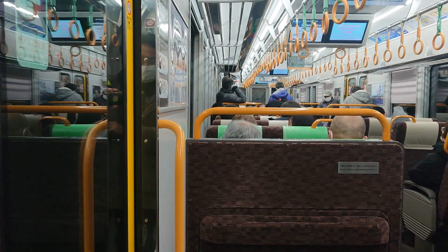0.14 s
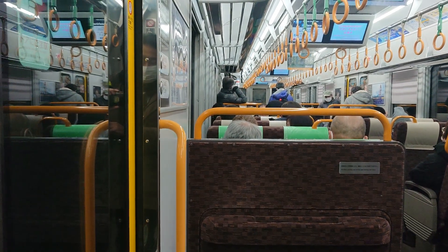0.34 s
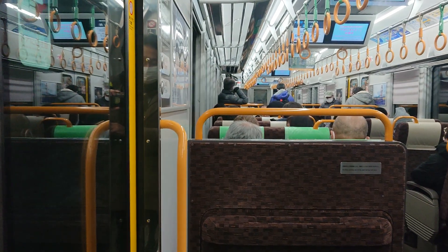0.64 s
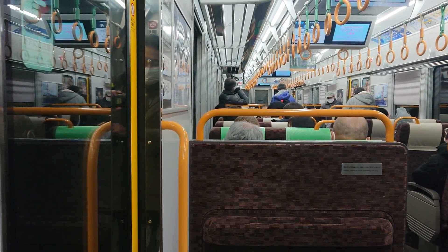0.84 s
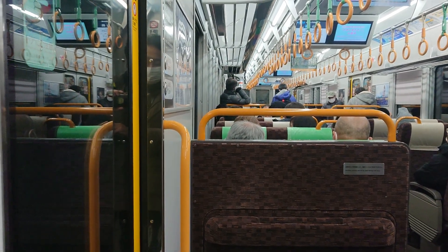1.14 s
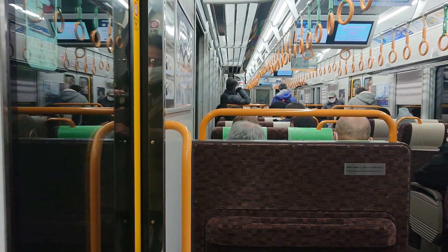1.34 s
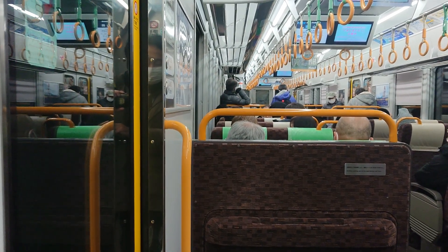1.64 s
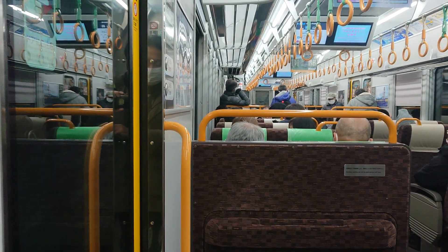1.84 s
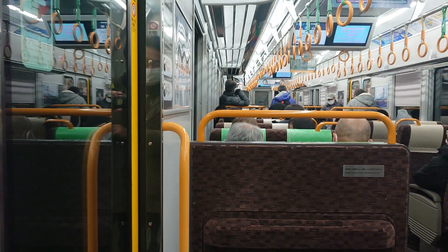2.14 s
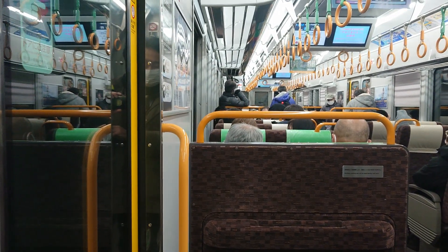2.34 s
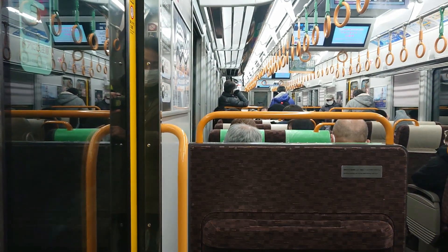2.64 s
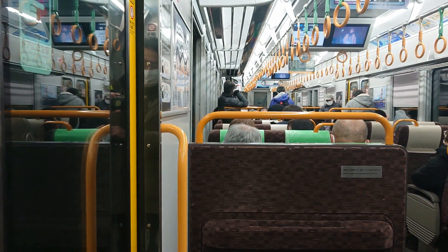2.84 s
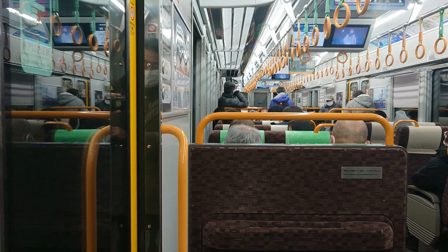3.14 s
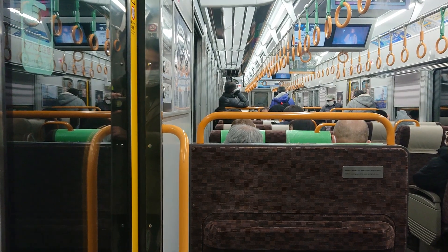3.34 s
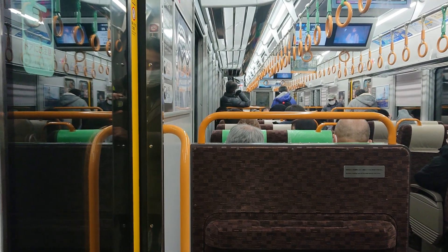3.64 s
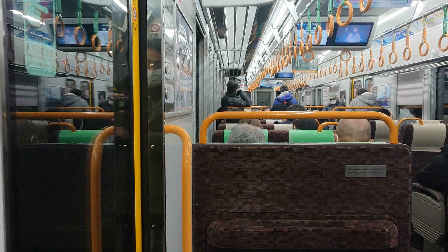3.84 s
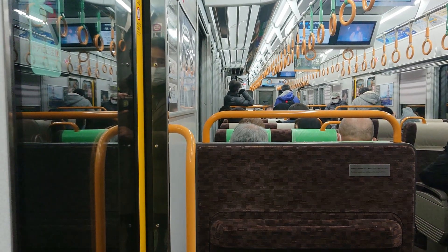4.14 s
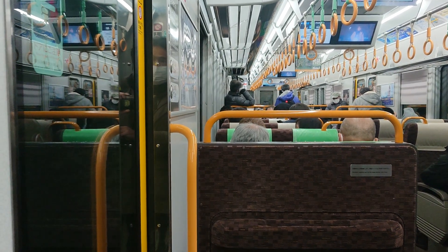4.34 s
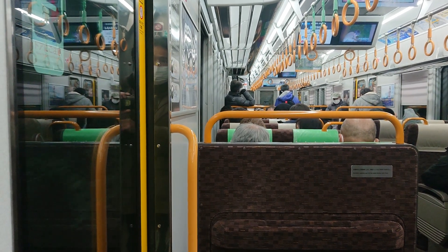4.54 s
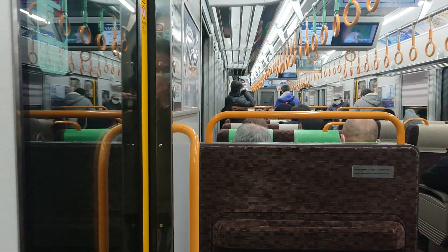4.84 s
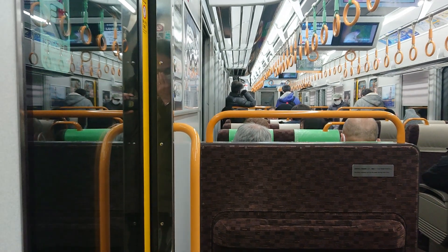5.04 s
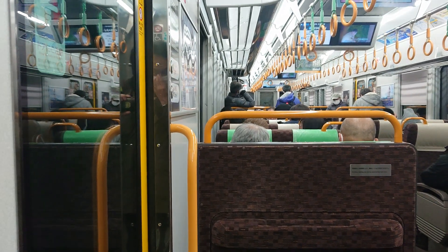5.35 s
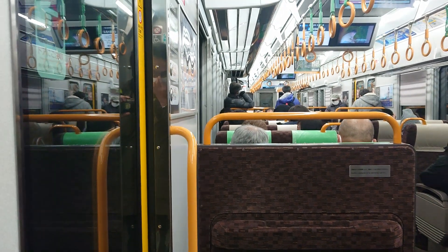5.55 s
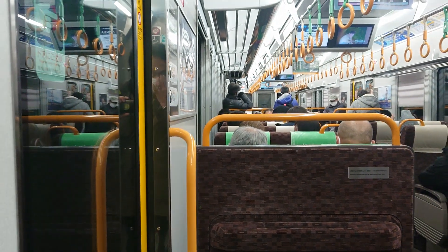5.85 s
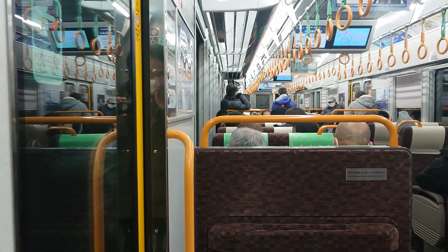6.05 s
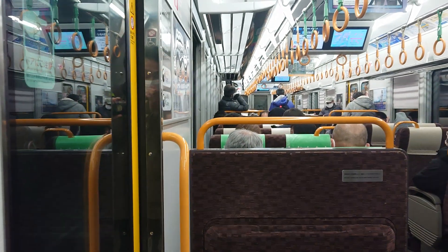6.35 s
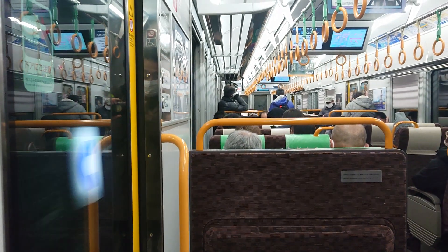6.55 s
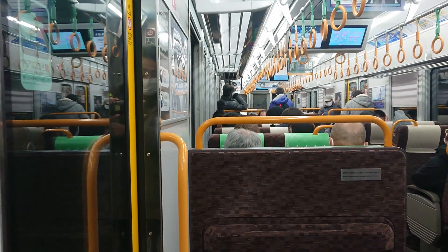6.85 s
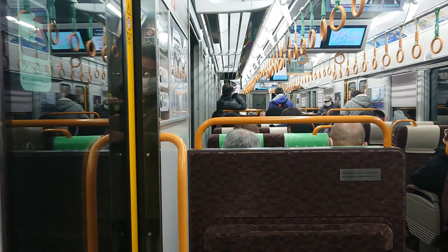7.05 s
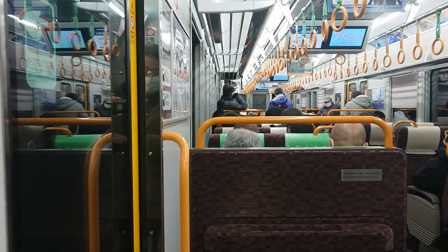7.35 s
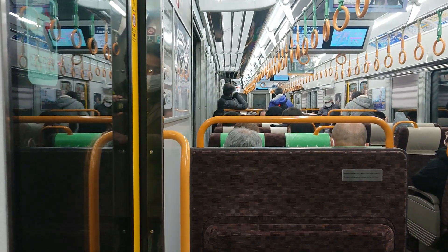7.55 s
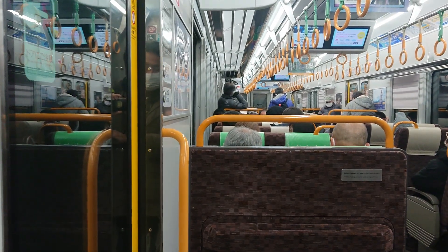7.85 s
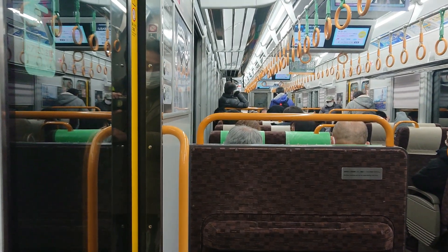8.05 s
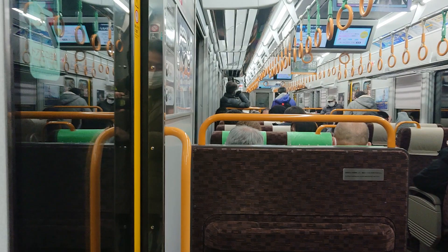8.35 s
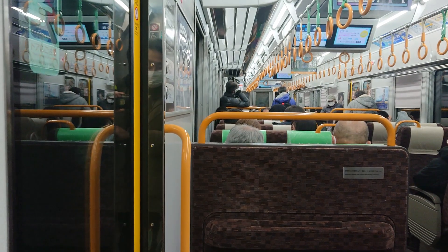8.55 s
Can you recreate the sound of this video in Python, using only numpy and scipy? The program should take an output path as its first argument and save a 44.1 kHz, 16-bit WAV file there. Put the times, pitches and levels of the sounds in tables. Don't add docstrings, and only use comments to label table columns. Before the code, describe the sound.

A train cabin heard from a seat by a handheld stereo phone: full low rumble, electric drive whine and thin air hiss. An early pair of light thumps carries a brief steely ring. The rumble dips and swells slightly in the middle, faint fabric rubbing comes and goes, one dry tick sounds on the left, and a heavy cluster of thuds arrives just before the end.

```python
import sys
import numpy as np
from scipy import signal
from scipy.fft import rfft, irfft, next_fast_len
from scipy.io import wavfile
from scipy.ndimage import uniform_filter1d

SR = 44100
rng = np.random.default_rng(int(sys.argv[2]) if len(sys.argv) > 2 else 0)


def boost(x):
    u = np.asarray(x, float) / 20
    return 10 ** u


def bounce(signal):
    frames = np.transpose(np.atleast_2d(signal))
    limited = np.clip(frames, -1, 1)
    pcm = np.round(limited * 32767).astype(np.int16)
    wavfile.write(sys.argv[1], SR, pcm)


N = 383229
TIME = np.arange(N) / SR
SIZE = next_fast_len(N)
FREQ = np.maximum(np.arange(SIZE // 2 + 1) * SR / SIZE, 1)


def on_time(table):
    seconds, level = np.transpose(table)
    return np.interp(TIME, seconds, level)


def on_freq(table):
    hz, value = np.transpose(table)
    return np.interp(np.log(FREQ), np.log(hz), value)


def noise_pair(correlation):
    first, other = rfft(rng.standard_normal((2, SIZE))) * np.sqrt(SR / 2)
    correlation = np.clip(correlation, 0, 1)
    second = correlation * first + np.sqrt(1 - correlation ** 2) * other
    return np.array([first, second])


def to_sound(spectrum):
    return irfft(spectrum, SIZE)[:, :N]


def walk(rate):
    hold = int(SR / rate)
    steps = np.repeat(rng.standard_normal(N // 200), hold)[:N]
    return uniform_filter1d(uniform_filter1d(steps, hold), hold)


def swell(db, inertia_s):
    return boost(uniform_filter1d(db, max(int(inertia_s * SR), 1)) - np.median(db))


def even(x, span_s):
    span = int(span_s * SR)
    power = uniform_filter1d(uniform_filter1d(np.mean(x ** 2, axis=0), span), span)
    return x * np.sqrt(power.mean() / power)


def bump(start_s, rise_s, fall_s, hold_s=0):
    t = TIME - start_s
    rising = (np.minimum(t, 0) / rise_s) ** 2
    falling = np.maximum(t - hold_s, 0) / fall_s
    return np.exp(-rising - falling)


# time in seconds, level in dB.
TRACK_ROUGHNESS = [(1.0, -0.5), (1.55, 0), (1.9, 0.5), (2.2, 1.5), (2.55, 0.3), (3.0, 1.5), (3.35, 1.2),
                   (3.75, -3.5), (4.15, -0.5), (4.55, -4), (4.8, 1.3), (5.1, 0.2), (5.38, 0), (5.7, 0),
                   (6.4, -1.2), (7.0, -0.1), (7.25, -1.2), (7.8, 1)]
# time in seconds, level in dB.
DRIVE_LOAD = [(0.0, -38), (0.45, -40.5), (0.7, -34), (1.1, -37.5), (1.7, -40.5), (2.3, -35.5), (2.55, -41),
              (2.7, -38.5), (3.2, -41.5), (3.8, -44.5), (4.5, -41.5), (5.05, -43.5), (5.4, -42),
              (6.35, -42), (6.9, -43.5), (7.6, -45.5), (8.1, -39), (8.69, -42.5)]
# start in seconds, thud in dB, ring in dB, fall in seconds.
AXLES = [
    (.6, 5, 3.5, 0.11),
    (.73, 3.5, 0.5, 0.07),
    (7.99, 12, 1.5, 0.08),
    (8.08, -2.5, 2.5, 0.053),
    (8.17, 4.5, .5, 0.14),
    (8.6, 0.5, .5, 0.092),
]


def follow(part, wander_rate):
    track, thud, ring, load, wander_db = part
    db = track * on_time(TRACK_ROUGHNESS) + load * on_time(DRIVE_LOAD) + wander_db * walk(wander_rate)
    for start_s, thud_db, ring_db, fall_s in AXLES:
        db = db + (thud * thud_db + ring * ring_db) * bump(start_s, 0.053, fall_s)
    return db


BAND_EDGES_HZ = [100, 340, 950, 1350, 1700, 2300, 3500, 5000]
# frequency in Hz, density in dB per Hz.
CAR_LEFT = [(25, -75), (55, -50.5), (110, -53), (230, -59), (420, -71), (620, -74), (750, -69), (950, -77),
            (1700, -80), (2900, -85), (5500, -100), (6200, -108), (6500, -135), (9000, -135)]
# frequency in Hz, density in dB per Hz.
CAR_RIGHT = [(25, -90), (55, -52), (110, -53), (230, -58.5), (420, -66.5), (620, -72.5), (750, -63.5),
             (950, -74.5), (1900, -68), (2900, -74.5), (4300, -82), (5900, -84), (7500, -99), (8950, -108),
             (9100, -125)]
# frequency in Hz, width in Hz, left in dB, right in dB.
PANELS = [(69, 15, 4, 3.5), (123.7, 6.3, 3.5, 2), (177.7, 12, 6.5, 6.5), (268.5, 36.5, 5, 2.5),
          (360, 35, 3.5, 2), (471.7, 17.3, 2, 9), (568, 32, 0, 6), (1129, 27, -7, 6), (954, 55, 1.5, 5.5),
          (302.5, 11.5, 1.5, 3.5), (1518, 140, 2, 3), (1810, 77, 7, 0.5), (2100, 200, 3.5, 2),
          (3153, 150, 3, 4.5)]
# frequency in Hz, correlation from 0 to 1.
PORT_LIKENESS = [(40, 0.97), (170, 0.985), (300, 0.86), (420, 0.62), (700, 0.76), (1000, 0.17),
                 (9000, 0.24), (12000, 0)]
# track share, thud share, ring share, load share, own wander in dB.
RESPONSES = [
    (0.92, 0.63, 0.01, 0.01, 1),
    (0.81, 0.99, 0.01, 0.01, 1.4),
    (0.084, 0.72, 1.1, 0.23, 0.8),
    (0.043, .02, 0.76, 0.12, 0.5),
    (.05, .02, 1.2, 0.2, 0),
]


def wheels():
    db = np.array([on_freq(CAR_LEFT), on_freq(CAR_RIGHT)])
    for hz, width, left_db, right_db in PANELS:
        resonance = 1 / (1 + (2 * (FREQ - hz) / width) ** 2)
        db = db + np.outer([left_db, right_db], resonance)
    body = noise_pair(on_freq(PORT_LIKENESS)) * boost(db)
    body[0] *= np.exp(-1j * 0.33)

    below = [1 / (1 + (FREQ / hz) ** 8) for hz in BAND_EDGES_HZ]
    shares = np.diff([0 * FREQ, *below, 1 + 0 * FREQ], axis=0)
    floor, panels, boom, rolling, _ = RESPONSES
    gains = [swell(follow(floor, 5), 0.033), swell(follow(panels, 6), 0.014), swell(follow(boom, 6), 0.041)]
    gains += [swell(follow(rolling, 3.103), 0.026) for _ in shares[3:]]
    return sum(gain * even(to_sound(body * share), 0.41) for gain, share in zip(gains, shares))


# frequency in Hz, wander width in Hz, rms level in dB,
# left minus right in dB.
WHINE_TONES = [(682.5, 24, -55.5, -13.5), (721, 14, -56.5, -7), (765, 10, -48, -3.5), (782, 8, -52.5, -9),
               (809, 16, -65.5, -11), (831.5, 26, -55, -4.5), (742, 32, -55, 4), (1523, 29, -60.5, -8),
               (2623, 8.7, -68.5, 5), (1173, 5.8, -72, -20)]


def whine():
    skirts, cores = 0, 0
    for hz, width, db, pan_db in WHINE_TONES:
        gain = boost(db + np.array([[pan_db], [-pan_db]]) / 2)
        skirt = 1 / np.sqrt(np.pi * width / 4) / (1 + (2 * (FREQ - hz) / width) ** 2)
        skirts = skirts + gain * skirt
        wandering_hz = hz + 0.9 * width * walk(3.3)
        cores = cores + gain * np.sin(2 * np.pi * np.cumsum(wandering_hz) / SR)
    tones = to_sound(noise_pair(0.59) * skirts) + 0.54 * cores
    load_db = on_time(DRIVE_LOAD) + 1.2 * walk(10)
    return even(tones, 0.06) * swell(load_db, 0.029)


# peak time in seconds, ring in Hz, peak in dB, length in seconds.
JOLTS = [(0.666, 92, -22.5, 0.035), (.70, 180, -26.5, 0.031), (0.756, 93, -20.5, 0.021),
         (.80, 113, -25.5, 0.03), (0.84, 61.5, -26, .03), (7.975, 142, -22, 0.079),
         (7.996, 237, -24, 0.013), (8.012, 178, -26, 0.016), (8.049, 85, -12.5, 0.0094),
         (8.065, 197, -14, 0.0056), (8.105, 69, -21.5, 0.036), (8.155, 150, -14.5, 0.01),
         (8.185, 171, -19, 0.018), (8.189, 70, -21, 0.027), (8.225, 138, -19, 0.019)]


def jolts():
    out = np.zeros(N)
    lead = SR // 8
    t = np.arange(-lead, lead) / SR
    for peak_s, hz, db, length_s in JOLTS:
        spread = np.where(t < 0, 0.61 * length_s, length_s)
        shape = np.exp(-(t / spread) ** 2)
        start = int(peak_s * SR) - lead
        out[start:start + len(t)] += boost(db) * shape * np.cos(2 * np.pi * hz * t)
    return np.outer(boost(np.array([0.5, -0.5])), out)


# start in seconds, centre in Hz, width in Hz, level in dB, rise in seconds, fall in seconds.
GEAR_RINGS = [(.04, 3150, 250, -46, .02, .2), (.585, 1300, 500, -46, .008, .03),
              (.58, 1125, 60, -49, .03, .15), (.6, 660, 90, -45, .05, .15), (.1, 2050, 250, -49, .05, .1),
              (7.972, 560, 280, -33.5, .006, .06), (7.975, 870, 220, -39, .006, .04),
              (7.985, 1100, 250, -49, .01, .06), (8.0, 330, 200, -36, .015, .04),
              (.58, 10800, 3000, -63, .004, .025), (.735, 770, 80, -36, .015, .25),
              (.7, 690, 50, -42, .04, .25), (8.075, 11500, 4000, -64, .008, .03),
              (8.075, 6800, 2400, -62, .01, .03), (8.12, 1500, 700, -46, .008, .03)]
# start in seconds, centre in Hz, width in Hz, level in dB,
# rise in seconds, fall in seconds.
TREAD_RINGS = [
    (.575, 1870, 170, -32.5, .005, .12),
    (.67, 1840, 170, -37, .04, .05),
]


def rings():
    lead = SR // 8
    out = np.zeros((2, N + SR))
    t = np.arange(-lead, SR) / SR
    for start_s, hz, width, db, rise_s, fall_s in [*GEAR_RINGS, *TREAD_RINGS]:
        band = signal.butter(2, [hz - width / 2, hz + width / 2], "band", fs=SR, output="sos")
        shared, own = signal.sosfilt(band, rng.standard_normal((2, len(t))))
        shape = np.where(t < 0, np.exp(-(t / rise_s) ** 2), np.exp(-t / fall_s)) / shared.std()
        left = boost(-8) * (0.5 * shared + own)
        start = int(start_s * SR)
        out[:, start:start + len(t)] += boost(db) * shape * np.array([left, shared])
    return out[:, lead:N + lead]


# frequency in Hz, left in dB, right in dB, 60 dB decay time in seconds.
CLICK_RINGS = [
    (3900, -11, -24, .0019),
    (5600, -24, -30, .002),
    (10300, -27, -30, .003),
    (12500, -32, -32, .0025),
    (14800, -29, -29, .002),
]


def click():
    out = np.zeros((2, N))
    t = np.arange(SR // 50) / SR
    contact = np.minimum(t / 0.0004, 1) ** 2
    start = int(6.38835 * SR)
    for hz, left_db, right_db, t60 in CLICK_RINGS:
        ring = contact * boost(-60 * t / t60) * np.sin(2 * np.pi * hz * t)
        out[:, start:start + len(t)] -= np.outer(boost(np.array([left_db, right_db])), ring)
    return out


# frequency in Hz, density in dB per Hz.
HISS_LEFT = [(8900, -135), (9300, -104), (10000, -94.5), (11500, -100), (13200, -106), (13700, -121),
             (15600, -134)]
# frequency in Hz, density in dB per Hz.
HISS_RIGHT = [(8900, -130), (9300, -103), (10000, -102), (11500, -100), (13200, -106), (13700, -121),
              (15600, -134)]


def upper_port():
    return boost(np.array([on_freq(HISS_LEFT), on_freq(HISS_RIGHT)]))


# frequency in Hz, density in dB.
RUSTLE = [(8000, -30.5), (10000, -10), (12800, 3), (14200, 7), (15500, 1), (16000, -40)]
# frequency in Hz, density in dB per Hz.
RUB_BODY = [(4000, -125), (6500, -104), (8600, -106), (9100, -125)]
# start in seconds, length in seconds, level in dB.
RUBS = [(0.0, .02, -98), (.55, .08, -86), (2.1, .08, -85), (4.62, 0.31, -69), (5.36, 0.051, -80),
        (6.0, 0.1, -81), (6.3, 0.14, -87), (6.45, 0.34, -75), (6.9, 0.13, -72), (7.15, 0.28, -77),
        (7.6, 0.13, -79), (8.02, .12, -88), (8.35, .1, -99)]


def cloth():
    bright = to_sound(noise_pair(0.23) * boost(on_freq(RUSTLE)))
    low = to_sound(noise_pair(0.42) * (upper_port() + boost(on_freq(RUB_BODY))))
    texture = bright / bright.std() + boost(7) * low / low.std()
    rise_s, fall_s = 0.04, 0.1
    rub = boost(-106)
    for start_s, length_s, db in RUBS:
        rub = rub + boost(db) * bump(start_s + rise_s, rise_s, fall_s, length_s)
    return texture * rub * boost(1.5 * walk(40))


def ventilation():
    hiss = to_sound(noise_pair(on_freq(PORT_LIKENESS)) * upper_port())
    return hiss * swell(follow(RESPONSES[4], 12), 0.02)


def scene():
    return wheels() + whine() + jolts() + rings() + click() + cloth() + ventilation()


def band_limit(x):
    return signal.sosfilt(signal.butter(12, 15600, fs=SR, output="sos"), x)


def record(dry):
    return band_limit(dry)


dry = scene()
out = record(dry)
bounce(out)
```